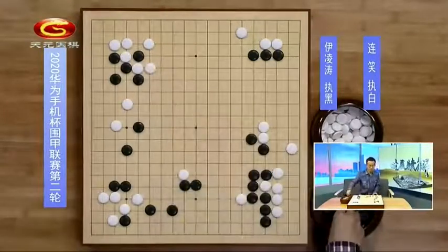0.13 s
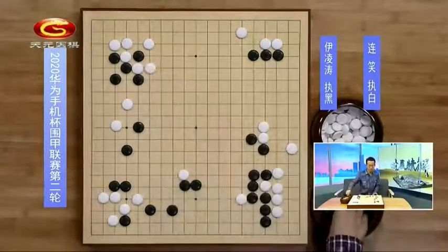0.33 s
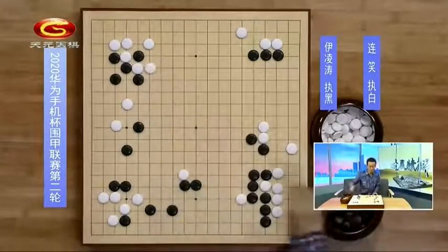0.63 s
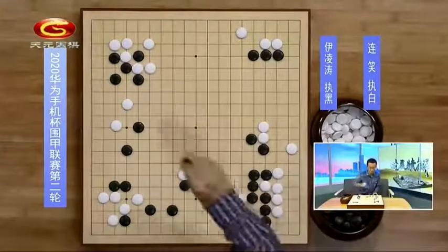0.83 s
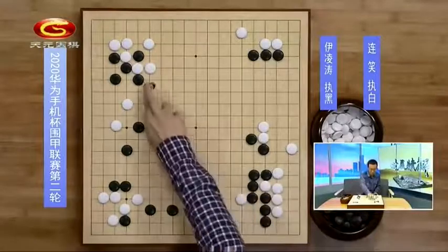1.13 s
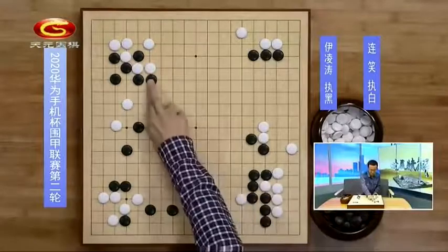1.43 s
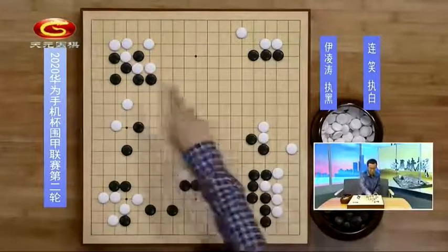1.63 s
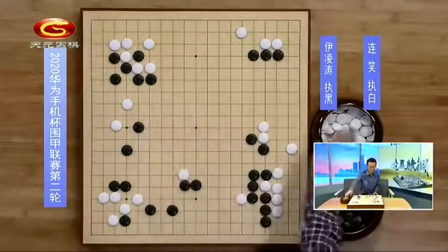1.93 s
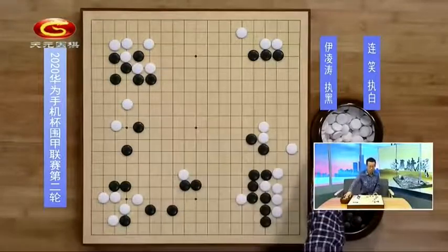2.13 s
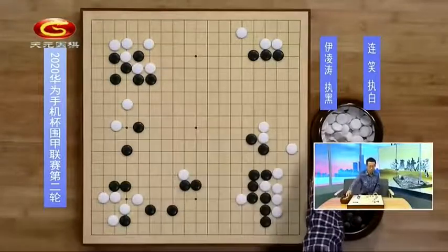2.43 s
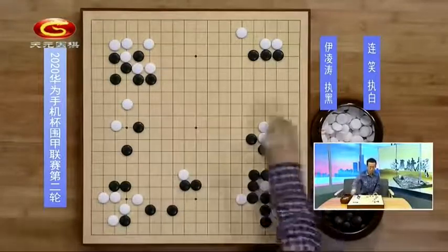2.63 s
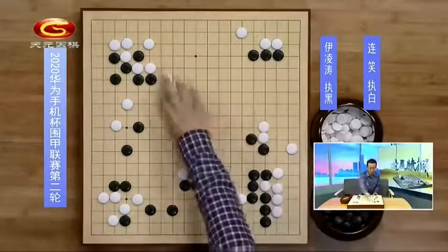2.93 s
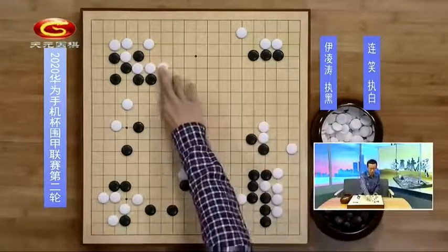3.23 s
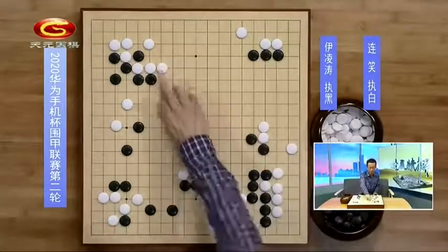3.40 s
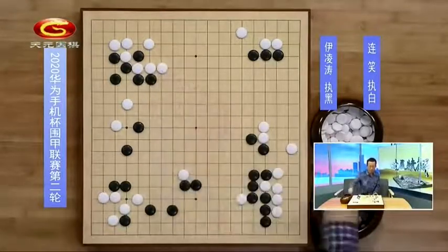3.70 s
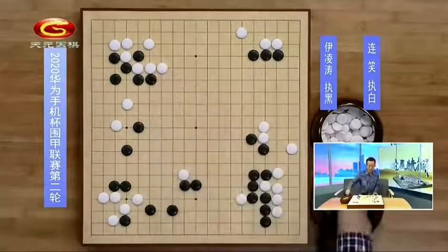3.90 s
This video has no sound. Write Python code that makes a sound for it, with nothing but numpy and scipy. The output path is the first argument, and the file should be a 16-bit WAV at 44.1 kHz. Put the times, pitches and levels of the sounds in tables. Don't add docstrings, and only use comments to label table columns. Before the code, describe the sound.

Small hard stones rattle in a bowl between two sharp clicks on a wooden board, over low ventilation rumble in a small room.

```python
import sys
import numpy as np
from scipy import signal
from scipy.io import wavfile
from scipy.ndimage import uniform_filter1d

SR = 44100
rng = np.random.default_rng(int(sys.argv[2]) if len(sys.argv) > 2 else 0)


def dump_mix(stems):
    frames = np.atleast_2d(stems).T
    limited = np.clip(frames, -1, 1)
    pcm = np.round(limited * 32767).astype(np.int16)
    wavfile.write(sys.argv[1], SR, pcm)


def amplitude_ratio(level_db):
    exponent = np.asarray(level_db, float) / 20
    return 10 ** exponent


N = 178957


def evened(x):
    return x / np.sqrt(np.mean(x ** 2) + 1e-20)


def read(points, hz):
    f, value = np.transpose(points)
    return np.interp(np.log(hz + 1), np.log(f + 1), value)


def add(mix, s, sound):
    part = mix[round(s * SR):][:len(sound)]
    part += sound[:len(part)]


def coloured(x, points, size=2048):
    hz = abs(np.fft.fftfreq(size, 1 / SR))
    octaves_over = np.log2(np.maximum(hz / points[-1][0], 1))
    gain_db = np.maximum(read(points, hz) - 12 * octaves_over, -100)
    log_gain = np.log(amplitude_ratio(gain_db))
    phase = -signal.hilbert(log_gain).imag
    taps = np.fft.ifft(np.exp(log_gain + 1j * phase)).real[:size // 2]
    return signal.oaconvolve(x, taps)[:len(x)]


def air(points, db, patchy_db):
    frames, hz = N // 512 + 6, np.fft.rfftfreq(2048, 1 / SR)
    a, b, patches = rng.standard_normal((frames, 1025, 3)).T
    patches = uniform_filter1d(patches, size=20, axis=0)
    patches = evened(uniform_filter1d(patches, size=8, axis=1))
    z = (a + 1j * b) * amplitude_ratio(read(points, hz)[:, None] + patchy_db * patches)
    noise = signal.istft(z, nperseg=2048, noverlap=1536)[1][:N]
    return amplitude_ratio(db) * evened(noise)


# (frequency [Hz], density [dB per Hz])
HISS_COLOUR = [(1500, -5), (3000, -9), (7000, -8), (11300, -11), (12200, -20.5), (13200, -49)]


def line_hiss():
    return air(HISS_COLOUR, db=-69, patchy_db=-1.0)


# (frequency [Hz], density [dB per Hz])
RUMBLE_COLOUR = [(12, -50.5), (31, -2), (53, 6), (98, -7), (703, -14.5), (1460, -25.5), (2200, -33),
                 (2860, -69)]


def rumble():
    return air(RUMBLE_COLOUR, db=-41.5, patchy_db=.6)


# (frequency [Hz], density [dB per Hz])
VENT_COLOUR = [(500, -14), (900, 1.5), (1500, 4.5), (2300, -1), (3500, -26), (6000, -26.5)]
# (peak time [s], half length [s], rise [dB])
GUSTS = [
    (0, 0.38, 6.5),
    (1.683, 0.24, 17.5),
    (3.753, 0.21, 11),
]


def draught():
    t = np.arange(N) / SR
    level_db = -61.5 + sum(db * np.exp(-((t - s) / half_s) ** 2) for s, half_s, db in GUSTS)
    return air(VENT_COLOUR, level_db, patchy_db=1.2)


# (frequency [Hz], t60 [s])
ROOM_T60 = [(100, 0.11), (300, 0.12), (800, 0.65), (2000, 0.52), (5000, 0.46), (11000, 0.5)]


def room(x):
    hz, frame_s, z = signal.stft(x, SR, nperseg=256, noverlap=192)
    power = abs(z) ** 2
    fine, broad = [uniform_filter1d(power, size=bins, axis=0) for bins in (3, 9)]
    power = np.where(hz[:, None] > 2500, broad, fine)
    since = frame_s[:700]
    bump = 1 + 3 * np.exp(-((since - .017) / .005) ** 2)
    first_wall = np.minimum(since / .013, 1) ** 2 * bump
    decay = first_wall * amplitude_ratio(-60 * since / read(ROOM_T60, hz)[:, None]) ** 2
    decay /= decay.sum(1, keepdims=True)
    power = abs(signal.fftconvolve(power, decay, axes=1)[:, :len(frame_s)])
    a, b = rng.standard_normal((len(frame_s), len(hz), 2)).T
    return signal.istft(np.sqrt(2 * power) * (a + 1j * b), SR, nperseg=256, noverlap=192)[1][:N]


# (frequency [Hz], gain [dB])
CRACK_COLOUR = [(150, -22), (500, -2.5), (1200, 7), (2500, 5), (4300, 7.5), (6000, 0.5), (7500, -11)]


def crack_coloured(x):
    return coloured(x, CRACK_COLOUR)


# (frequency [Hz], gain [dB])
SHEEN_COLOUR = [(5000, 1.5), (6500, 3), (8000, -0.5), (9800, 2), (11800, -2), (14000, -7.5)]


def sheen_coloured(x):
    return coloured(x, SHEEN_COLOUR)


def rustle(rows, per_s, spread_db, grain_t60, treble_db, rise_s):
    t = np.arange(N) / SR
    size = amplitude_ratio(spread_db * np.minimum(rng.exponential(1, N), 4))
    size *= rng.random(N) < per_s / SR
    envelope = signal.oaconvolve(size, amplitude_ratio(-60 * t[:1500] / grain_t60))[:N]
    grains = envelope * rng.standard_normal((2, N))
    low, high = evened(crack_coloured(grains[0])), evened(sheen_coloured(grains[1]))
    moving = np.zeros(N)
    for s, hold_s, db, fade_db_per_s in rows:
        rise = np.clip((t - s) / rise_s, 0, 1)
        moving += rise * amplitude_ratio(db - fade_db_per_s * np.maximum(t - s - hold_s, 0))
    return moving * (low + amplitude_ratio(treble_db) * high)


# (start [s], hold [s], level [dB], fade [dB per s])
SWEEPS = [
    (0, 0.17, -53, 800),
    (1.45, 0.11, -47, 400),
    (1.655, 0.041, -44, 300),
    (1.71, 0.099, -48.5, 90),
    (3.535, 0.024, -45.5, 1500),
    (3.57, 0.041, -51.5, 498),
]


def cloth():
    return rustle(SWEEPS, per_s=4000, spread_db=-5.0, grain_t60=0.0098, treble_db=-4.5, rise_s=0.004)


# (start [s], hold [s], level [dB], fade [dB per s])
STIRS = [
    (.127, 0.046, -30.5, 705),
    (.26, 0.048, -48.5, 500),
    (.36, 0.16, -37, 800),
    (2.11, 0.056, -24, 355),
    (2.2, 0.15, -40.5, 300.5),
    (2.3, 0.039, -36, 194),
    (2.45, 0.021, -36, 64),
    (3.955, 0.0067, -18.5, 119),
]


def sliding_stones():
    return rustle(STIRS, per_s=1200, spread_db=4.0, grain_t60=.015, treble_db=-2.5, rise_s=.015)


def table(rows, lift_db, wait_s):
    t, out = np.arange(SR // 2) / SR, np.zeros(N)
    for s, db, hz, t60 in rows:
        swing = np.sin(2 * np.pi * hz * t * (1 + 1.2 * np.exp(-t / 0.0081)))
        add(out, s + wait_s, -amplitude_ratio(db + lift_db - 60 * t / t60) * swing)
    return out


# (time [s], peak [dB], t60 [s])
THUMPS = [(0.131, -20, 0.046), (.178, -27, 0.085), (0.309, -37, 0.2), (.358, -41, 0.12),
          (0.643, -29.5, 0.3), (.747, -25.5, .06), (1.189, -34, 0.16), (1.281, -43.5, .09),
          (1.323, -19, 0.1), (2.111, -22, 0.057), (2.31, -34.5, .25), (2.528, -29, 0.092),
          (2.551, -36.5, 0.22), (3.219, -14, 0.064), (3.96, -25.5, 0.067)]


def table_pushes():
    rows = [(s, db, 35, t60) for s, db, t60 in THUMPS]
    return table(rows, lift_db=9.0, wait_s=0.0039)


# (time [s], peak [dB], frequency [Hz], t60 [s])
PATS = [(0.127, -19, 404, 0.027), (0.248, -35, 165, 0.012), (0.318, -60.5, 220, 0.022),
        (0.647, -34, 524, 0.063), (1.191, -27.5, 167, 0.019), (1.324, -23, 543, 0.039),
        (2.112, -26.5, 324, 0.04), (2.128, -24.5, 239, 0.074), (2.447, -23.5, 588, 0.076),
        (3.218, -20.5, 368, 0.067), (3.545, -19, 219, 0.017), (3.577, -33.5, 497, 0.036),
        (3.956, -29, 380, 0.036)]


def finger_pats():
    return table(PATS, lift_db=4.0, wait_s=.0025)


def knocks(rows, modes, ring_db, detune, ping_db, treble_db, crack_t60, flat_db):
    t = np.arange(SR // 8) / SR
    crack, sheen, ring = np.zeros((3, N))
    hz, mode_db, mode_t60 = np.transpose(modes)[:, :, None]
    for s, db, wood_db, ping_hz in rows:
        t60 = crack_t60 * amplitude_ratio(flat_db * wood_db / 10) * (3000 / ping_hz) ** 0.15
        t60 = np.clip(t60, .004, .06)
        fade = amplitude_ratio(db - 60 * t / t60)
        burst = rng.standard_normal((2, len(t))) * fade * np.minimum(t / .0003, 1)
        burst *= .5 * np.linalg.norm(fade) / np.linalg.norm(burst, axis=1, keepdims=True)
        burst[:, 8:10] += 2.6 * amplitude_ratio(db) * np.array([[1], [2]]) * [1, -.4]
        add(crack, s, burst[0])
        add(sheen, s, amplitude_ratio(treble_db) * burst[1])

        spot = rng.standard_normal((2, len(modes), 1))
        mode_fade = amplitude_ratio(mode_db + 1.8 * spot[0] - 60 * t / mode_t60)
        wood = mode_fade * np.sin(2 * np.pi * hz * (1 + detune * spot[1]) * t)
        add(ring, s, amplitude_ratio(db + wood_db + ring_db) * wood.sum(0) * np.minimum(t / 0.0018, 1))

        ping = np.sin(2 * np.pi * ping_hz * t)
        add(ring, s, amplitude_ratio(db + ping_db - 75 * t / t60) * ping)
        add(ring, s, amplitude_ratio(db - 4 - 60 * t / 0.012) * ping)
    return amplitude_ratio(-0.5) * crack_coloured(crack) + amplitude_ratio(6.0) * sheen_coloured(sheen) + ring


# (frequency [Hz], level [dB], t60 [s])
BOWL_MODES = [(1078, 3.5, 0.034), (1169, 0, 0.016), (1015, -40, 0.014), (1449, -4.5, 0.028),
              (371.4, -5, 0.024), (1672, 11.5, 0.0062), (2450, -17.5, 0.14)]
# (time [s], crack peak [dB], wood ring re crack [dB], stone ping [Hz])
BURIED = [
    (.142, -17, 4.5, 1970),
    (.181, -10.5, 7.5, 3190),
    (2.3126, -10.5, -1, 2950),
    (2.3187, -17.5, -26, 2870),
    (2.3871, -13, 1.5, 3880),
    (3.9646, -11.5, 0, 4530),
    (3.9806, -15, 2, 2760),
    (4.0017, -8.5, -12, 4800),
    (4.0148, -6, -23, 4280),
]


def buried_stones():
    return knocks(BURIED, BOWL_MODES, ring_db=-10.0, detune=0.01, ping_db=-8.0, treble_db=-13.0,
                  crack_t60=0.04, flat_db=1.0)


# (time [s], crack peak [dB], wood ring re crack [dB], stone ping [Hz])
FIRST_DIG = [(.1285, -7.5, 3.5, 6530), (.1315, -7, -5, 3180), (.1502, -10.5, 1.5, 5140),
             (.2534, -18.5, 3.5, 2450), (.279, -61, -14, 3260), (.3067, -18.5, -1.5, 2580),
             (.3214, -13.5, -8.5, 5200), (.3364, -27, -20, 2680), (.3534, -23, 2, 2430),
             (.3602, -20, 0, 5650), (.3774, -24.5, 0, 2360), (.4271, -30, -5, 2600),
             (.4596, -28.5, -17, 2700), (.4882, -24, -15, 6240), (.4976, -18.5, -4, 2840),
             (.5045, -21.5, -42, 2960), (.5151, -18, 1, 2680), (.6422, -20, -1, 2860),
             (.6473, -22.5, 5, 4300), (.6511, -12.5, -16, 2500), (.6642, -19.5, -5, 5100),
             (.6833, -12, -18, 4900), (.6982, -15.5, -9, 3200), (.7112, -13, -2.5, 5830),
             (.7384, -12, -44, 2200), (.7462, -9.5, -3.5, 5000), (.7568, -15, -3, 6400)]
# (time [s], crack peak [dB], wood ring re crack [dB], stone ping [Hz])
SECOND_DIG = [(2.1126, -11, -18, 5380), (2.1194, -19, 6, 6030), (2.1324, -15.5, 2, 3070),
              (2.1526, -18, -5, 4400), (2.176, -17, 4, 1870), (2.1939, -30, -20.5, 3590),
              (2.2308, -26.5, -7, 3570), (2.2867, -43.5, -13, 4030), (2.3042, -19.5, -6, 4030),
              (2.3486, -42, -10, 3970), (2.3581, -23.5, 3.5, 3780), (2.3716, -23.5, 0.5, 1920),
              (2.434, -23, 3.5, 2030), (2.4496, -7.5, -6.5, 3040), (2.4605, -11, -1, 1900),
              (2.4821, -21, 4.5, 2850), (2.5267, -6, -6, 5250), (2.5553, -7.5, -9, 4330),
              (2.578, -13.5, 1.5, 2990), (2.613, -19, -27, 1960)]
# (time [s], crack peak [dB], wood ring re crack [dB], stone ping [Hz])
THIRD_DIG = [
    (3.961, -8, -19, 2730),
    (3.9797, -4, -9.5, 4680),
    (4.0102, -13, 0, 5230),
    (4.0239, -9.5, -3.5, 4850),
    (4.0327, -8.5, -31.5, 3264),
    (4.0468, -16, -6, 6500),
    (4.0534, -19, -16, 5170),
]


def bowl_stones():
    return knocks(FIRST_DIG + SECOND_DIG + THIRD_DIG, BOWL_MODES, ring_db=-3.5, detune=.035, ping_db=-15.0,
                  treble_db=-6.0, crack_t60=0.04, flat_db=4.5)


# (frequency [Hz], level [dB], t60 [s])
BOARD_MODES = [(885, 3, .048), (730, -1, .035), (1140, -10, .04), (1530, -11, .04), (1690, -10, .06),
               (350, -20, .04), (2030, -14, .025), (2290, -14, .02)]
# (time [s], crack peak [dB], wood ring re crack [dB], stone ping [Hz])
NAILS = [
    (.5965, -24, -15, 5070),
    (.614, -27.5, -5, 2836),
    (1.598, -26.5, -42, 5240),
    (1.6107, -25.5, -27, 2270),
    (3.5458, -20.5, -20, 2100),
]


def nail_ticks():
    return knocks(NAILS, BOARD_MODES, ring_db=-3.5, detune=.005, ping_db=-17.5, treble_db=-8.5,
                  crack_t60=0.036, flat_db=4.1)


# (frequency [Hz], level [dB], t60 [s])
EDGE_MODES = [(913, -2, .05), (730, -9, .03), (1150, -14, .03), (1500, -9.5, 0.035), (2290, -1, 0.029),
              (3150, -10.5, .02), (4100, -13.5, .015), (5100, -15, 0.016)]
# (time [s], crack peak [dB], wood ring re crack [dB], stone ping [Hz])
TOUCHES = [
    (1.1925, -2.5, -23, 2700),
    (1.1932, -19, -29.5, 3950),
    (1.2728, -28, -17, 2350),
    (1.29, -4.5, -4, 4200),
    (3.1812, -9.5, -6, 2500),
    (3.5785, -28, -24, 1580),
]


def edge_touches():
    return knocks(TOUCHES, EDGE_MODES, ring_db=4.0, detune=.006, ping_db=-12, treble_db=-43.0,
                  crack_t60=0.064, flat_db=8.0)


# (time [s], crack peak [dB], wood ring re crack [dB], stone ping [Hz])
BOARD_KNOCKS = [(1.3252, -3, -3, 2960), (1.3275, -5.5, 4.5, 5580), (1.3428, -15, -21, 2450),
                (3.2215, 2.5, -19, 3820), (3.2245, -2, -13.5, 4100), (3.232, -19, -17, 4670),
                (3.3225, -23, -35, 6300), (3.459, -42, -18.5, 4620), (3.507, -46.5, -14, 6520),
                (3.714, -47, 14, 3330), (3.741, -43, -16.5, 4770)]


def board_clicks():
    return knocks(BOARD_KNOCKS, BOARD_MODES, ring_db=-5.5, detune=0.0052, ping_db=-9.5, treble_db=-5.5,
                  crack_t60=0.035, flat_db=5.9)


# (frequency [Hz], gain [dB])
HAND_SHADE = [(800, -1.5), (2500, -4), (4500, -12), (7000, -7.5), (12000, -31)]


def scene():
    near = bowl_stones() + buried_stones() + board_clicks()
    near += sliding_stones()
    near += cloth()
    near += finger_pats()
    shaded = edge_touches() + nail_ticks()
    tail = room(near + coloured(shaded, HAND_SHADE))
    mono = near + shaded + amplitude_ratio(-10.0) * tail + table_pushes()
    mono += rumble()
    mono += draught()
    return np.array([mono, mono])


# (frequency [Hz], level [dB])
APART = [(300, -50), (700, -66), (1400, -55), (2500, -36), (5000, -32), (9000, -26), (12500, -15)]
# (frequency [Hz], gain [dB])
BAND_LIMIT = [(11000, -1.5), (11900, -4), (12500, -25), (13500, -54), (15000, -65), (17000, -95)]
# (frequency [Hz], level [dB per bin])
WEAKEST_PASSED = [(900, -95), (1500, -77.5), (2300, -82.5), (3500, -73), (6000, -75), (9000, -79),
                  (11300, -68), (12300, -66)]


def grit_and_gate(x):
    hz, _, z = signal.stft(1.168 * np.tanh(x / 1.338), SR, nperseg=512)
    grit = uniform_filter1d(abs(z), size=5, axis=0) * np.exp(2j * np.pi * rng.random((2, *z.shape)))
    limit_db = read(BAND_LIMIT, hz)
    side_gain = amplitude_ratio(read(APART, hz) + limit_db - 1.5)[:, None]
    side = signal.istft(grit[0] * side_gain, SR, nperseg=512)[1][:N]
    gritty = signal.istft((z + amplitude_ratio(-17) * grit[1]) * amplitude_ratio(limit_db)[:, None], SR, nperseg=512)[1][:N]

    hz, _, z = signal.stft([gritty + side, gritty - side], SR, nperseg=1024)
    band = (hz // 345).astype(int)
    starts = np.flatnonzero(np.diff(band, prepend=-1))
    power = np.add.reduceat(abs(z[0]) ** 2, starts, axis=0)[band] / 8
    over_db = 10 * np.log10(power + 1e-20) - read(WEAKEST_PASSED, hz)[:, None]
    return signal.istft(z * np.clip(over_db / 2.0, 0, 1), SR, nperseg=1024)[1][:, :N]


def roll_off(x):
    return signal.sosfilt(signal.butter(12, 13110, fs=SR, output="sos"), x)


def record(dry):
    line = grit_and_gate(dry[0]) + line_hiss()
    return roll_off(line)


dry = scene()
out = record(dry)
dump_mix(out)
```